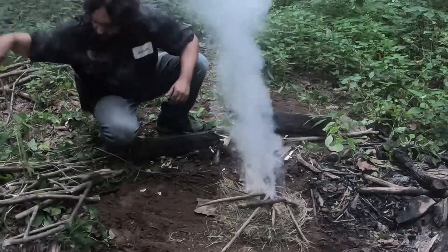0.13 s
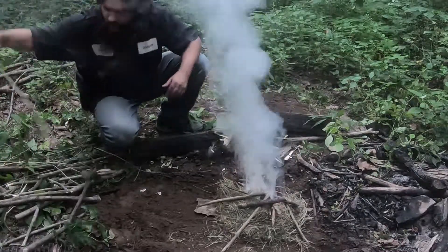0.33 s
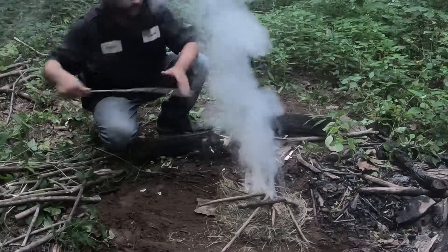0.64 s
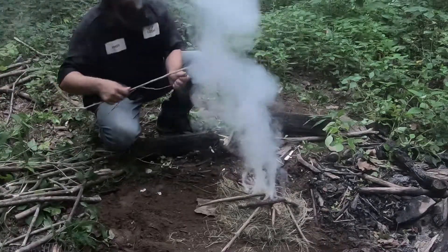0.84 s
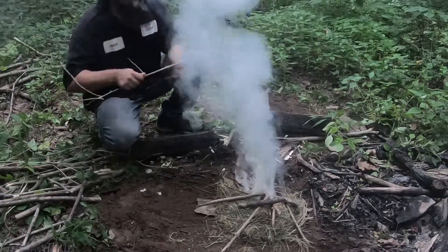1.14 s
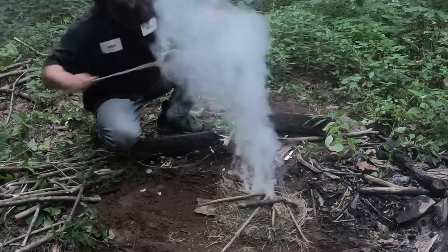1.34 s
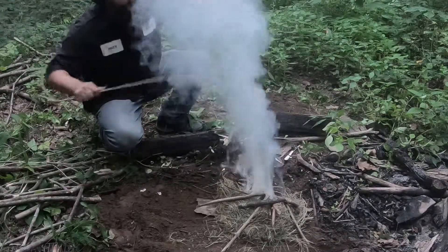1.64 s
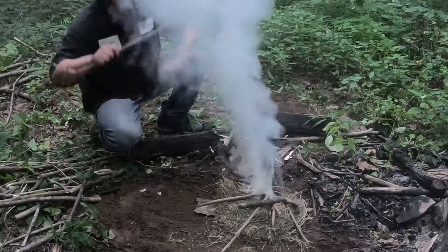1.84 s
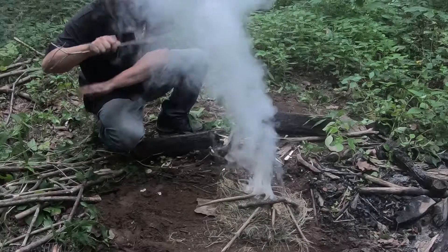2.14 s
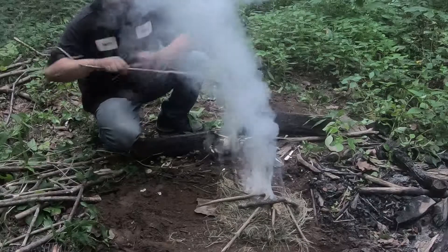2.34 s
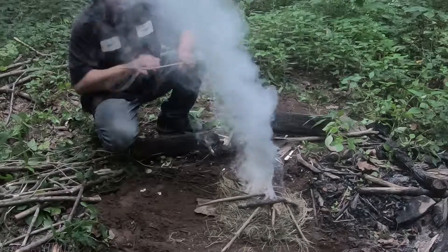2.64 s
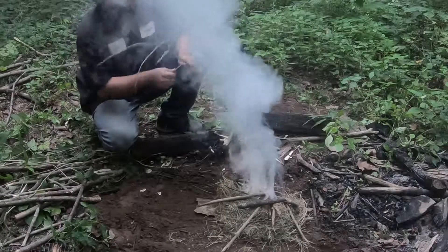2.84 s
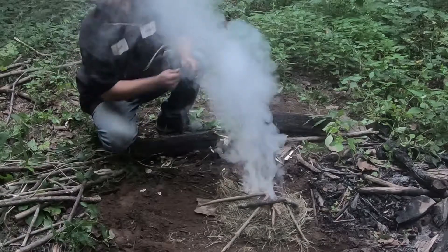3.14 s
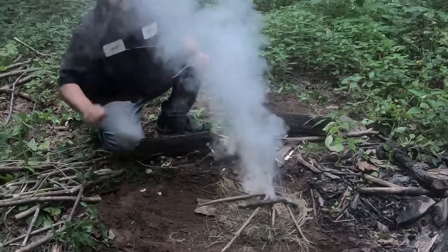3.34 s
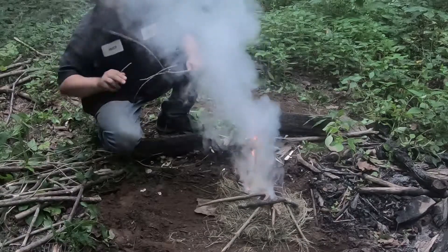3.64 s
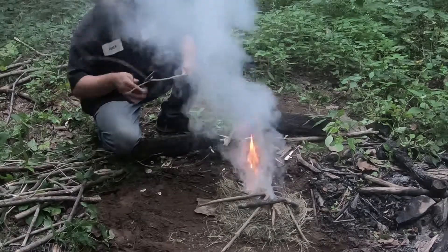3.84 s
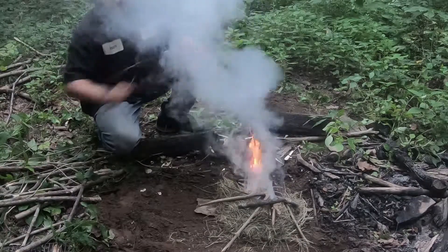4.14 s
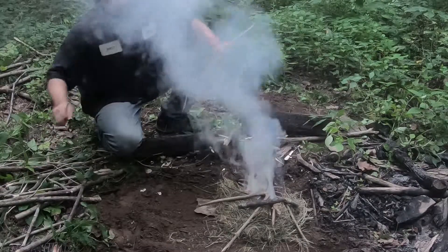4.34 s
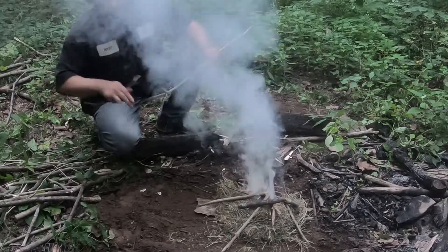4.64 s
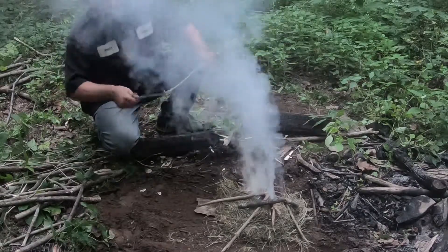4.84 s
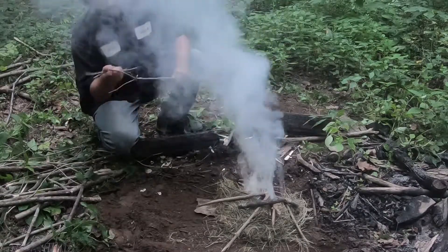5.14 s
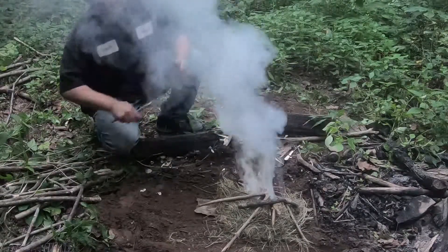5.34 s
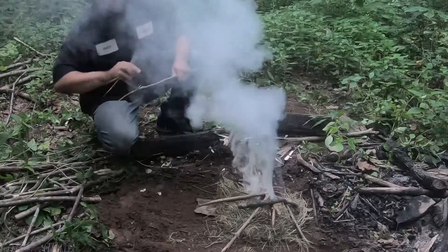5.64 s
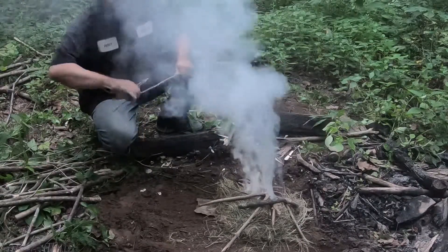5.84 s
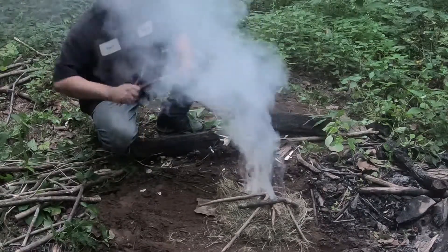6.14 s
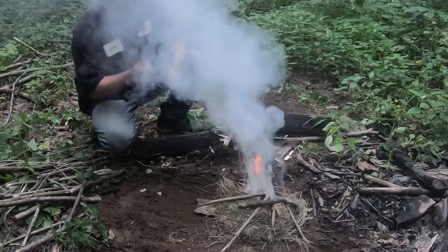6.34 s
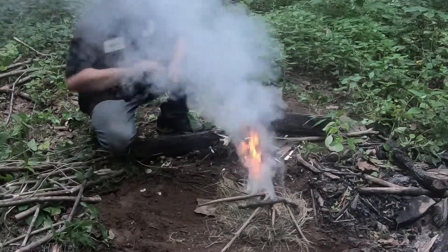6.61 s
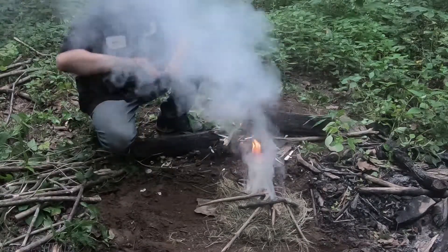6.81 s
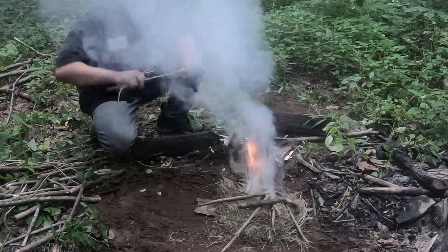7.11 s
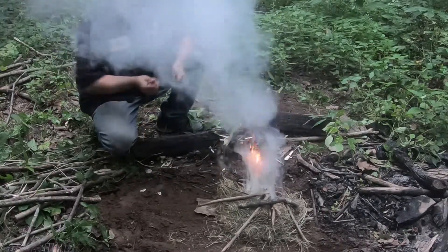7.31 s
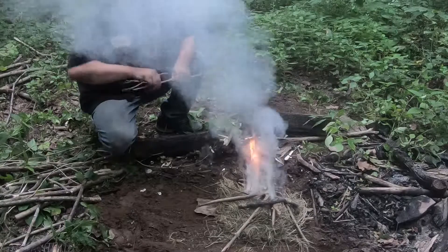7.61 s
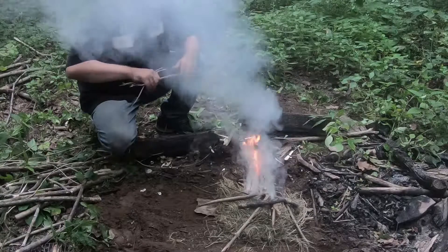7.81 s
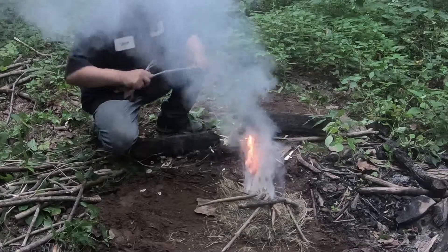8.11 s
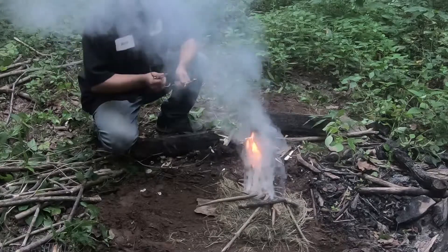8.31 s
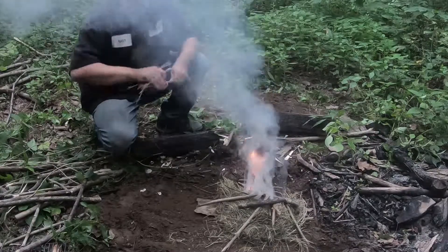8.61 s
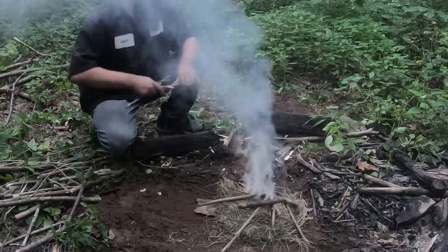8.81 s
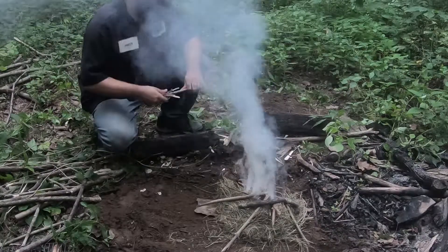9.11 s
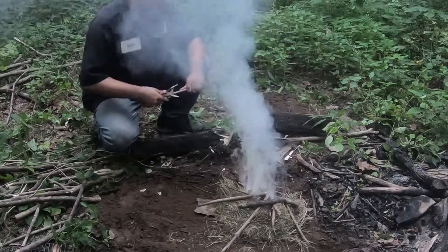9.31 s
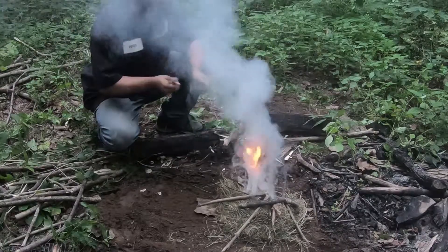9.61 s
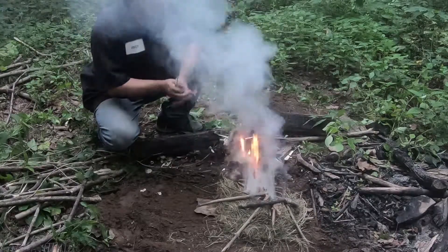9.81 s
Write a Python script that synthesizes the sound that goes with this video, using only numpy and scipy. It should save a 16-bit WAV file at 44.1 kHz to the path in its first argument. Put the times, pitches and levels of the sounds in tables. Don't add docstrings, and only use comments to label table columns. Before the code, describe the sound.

Close stereo pickup in a forest clearing. From 0 to 0.4 s dry brush rustles with crisp bark ticks under a cricket trill; a bright bird chip comes at 0.6 s. A dull, echoing twig break at 1.2 s brings a short rattle and small woody knocks until 1.9 s. A tiny crack follows at 2.3 s, a thin bright snap at 2.9 s, and faint high bird chips near 3.6 s. Louder bright snaps come at 4.9, 6.2 and 7.2 s, then the strongest, a tight double crack at 8.15 s, and a drier, duller break at 9.4 s. Between them are faint ticks, creaks, finger scratches and ember spits. Snaps leave soft bright tails among the trunks. Throughout, crickets pulse around 4 to 4.5 kHz over a steady insect band, with quiet low traffic rumble, wavering engine hums swelling slightly after 8.5 s, and soft air buffets.

```python
import sys
import numpy as np
from scipy import signal
from scipy.fft import rfft, irfft
from scipy.io import wavfile
from scipy.ndimage import uniform_filter1d

SR = 44100
rng = np.random.default_rng(int(sys.argv[2]) if len(sys.argv) > 2 else 0)


def pcm_store(signal):
    levels = np.round(np.clip(np.atleast_2d(signal), -1, 1) * 32767)
    wavfile.write(sys.argv[1], SR, levels.astype(np.int16).T)


def boost_factor(decibels):
    exponent = np.asarray(decibels, float) / 20
    return 10 ** exponent


N = 439236

# t/s, peak level/dB, low level/dB, treble level/dB, echo level/dB
SNAPS = [
    (1.2252, -28, -3.5, -12, 8.5),
    (2.9172, -23, -24, 1, -5),
    (4.9192, -18.5, -11, 9.5, -7),
    (6.1815, -14, -11, 7.5, 1),
    (7.1806, -16, -15, 6.5, -3),
    (8.1487, -14.5, -11, 1.5, 0),
    (8.1715, -10, -11, 2, -3),
    (9.3799, -12.5, -15, -8, -7.5),
]
# (f/Hz, level/dB)
SNAP_GRAIN = [
    ([(2200, 6), (3200, 6), (4300, 4), (7600, 10), (9400, -6), (10400, 12)], [(7500, 8)]),
    ([(1900, 5), (4900, -6), (5800, 2), (6600, -5), (7600, -9), (8300, 8), (10200, 4), (11000, -8)], []),
    ([(2700, -5), (1900, 3), (5700, -6), (6500, 3), (7400, 3), (8700, -3), (10100, 8), (11000, -5)], [(9300, -4)]),
    ([(2100, -4), (4000, 8), (7300, -6), (8500, 12), (7900, -6), (10900, -6), (13000, 6)], [(4800, -3)]),
    ([(1800, 6), (2900, -7), (3900, 10), (4400, -9), (6100, 7), (6900, -6), (9000, -4), (9600, 6), (10400, -5), (13600, 7)], [(4700, -3), (6700, -6), (7800, 7), (8600, -11), (9500, 5)]),
    ([(3300, 7), (4300, 7), (5000, -6), (7100, 12), (9500, -5), (10900, 8)], [(3000, -4)]),
    ([(1200, -6), (1700, 5), (3300, -3), (5900, -3), (7000, 4), (7600, -4), (8200, -6), (11100, 7), (12200, -6)], []),
    ([(1500, -13), (2300, 9), (3500, 4), (6200, -5), (7100, 7), (9600, -12), (11800, -8), (12600, 9)], [(3200, -6), (7800, 8), (9500, 1), (6500, 4), (11500, 6), (13000, 8)]),
]
# t/s, peak level/dB, treble level/dB
SMALL_SLIPS = [(2.3095, -39, -30), (2.9188, -29, 0), (2.9306, -43, 12), (4.112, -50, -12),
               (8.1514, -23, -1.5), (9.37, -46.5, -12), (9.3817, -19, -2), (9.3867, -33, -2),
               (2.2952, -44, -28), (1.2266, -25.5, -14), (1.251, -47, 5), (.0795, -35, -30),
               (4.9212, -31, 2), (7.1812, -23, 12), (1.2375, -41, -12), (9.3885, -37, 3)]
# t/s, peak level/dB, low level/dB, treble level/dB
TICKS = [(0.0128, -31, -22, -4.5), (0.0282, -33.5, -19, -10), (0.0772, -29.5, -5, -30),
         (0.142, -41, -18, -13), (0.2055, -42, -4, -22), (0.2217, -46, -6, -21), (0.4404, -44.5, -15, -21),
         (0.66, -48, -6, -16), (0.8023, -39, -4, -4), (1.2734, -37, -8, -22), (1.718, -47, -17, -23),
         (1.9015, -48, -2, -22), (1.914, -39.5, -6, -30), (1.9648, -47, -6, -16), (2.3025, -35, -12, -26),
         (2.9676, -44, -7, -4), (3.1615, -32.5, -8, -3), (3.2288, -42.5, -13, -23),
         (3.6295, -32.5, -10, -19), (3.7983, -46.5, -2, -15), (3.8264, -49, -3, -22),
         (4.1016, -40, -12, -10), (4.3505, -52, -25, -3), (5.9744, -49, 11, 2.5), (6.11, -48.5, -23, -7.5),
         (6.9772, -45.5, -4, -8.5), (7.3771, -44, -44, -22), (7.5233, -49, -18.5, -22),
         (7.65, -48, -27, -10), (8.8598, -48.5, -12, -3)]
# t/s, peak level/dB
CREAKS = [(0.167, -50), (1.049, -55.5), (1.5174, -49), (3.2444, -50), (4.3848, -49.5), (4.4665, -54),
          (4.5085, -52), (4.7443, -50.5), (5.7438, -54.5), (6.394, -46.5), (7.335, -54), (7.4355, -57),
          (7.708, -54), (8.5312, -54.5), (8.673, -52.5), (8.702, -55), (9.7798, -51.5), (9.842, -55)]
# t/s, peak level/dB
SPITS = [(0.736, -52), (2.8539, -53), (4.0662, -52.5), (4.5488, -53), (4.6455, -55), (5.231, -58),
         (6.563, -51), (7.476, -54), (7.5652, -50), (8.6268, -54.5), (9.1765, -56), (9.285, -52)]
# t/s, peak level/dB, ring
# f/Hz
TAPS = [(.0167, -37, 3000), (.0425, -42, 3200), (.0545, -42, 1500), (.0705, -43, 2400), (.0805, -40, 1900),
        (.1015, -45, 1400), (.148, -45, 2600), (.258, -48, 3500), (.4232, -56, 2400), (.445, -52, 2800),
        (.481, -55, 2800), (.493, -55, 2600), (1.166, -59, 2900), (1.203, -56, 1400), (1.211, -56, 1100),
        (2.5297, -61, 2600), (2.5641, -60, 2600), (2.8914, -56, 2900), (3.333, -60, 3300),
        (3.3589, -60, 3300), (3.813, -55, 1500), (3.834, -55, 1900), (3.9302, -59, 2700),
        (3.9901, -61, 2600), (4.0878, -54, 2800), (4.477, -54, 2100), (4.582, -61, 2100),
        (4.6002, -58, 3400), (4.6306, -60, 3100), (4.7169, -56, 2500), (5.313, -61, 3200),
        (5.52, -58, 3300), (5.8288, -63, 2300), (6.0304, -57, 2100), (6.8989, -61, 3400),
        (7.2622, -54, 3400), (7.342, -54, 3200), (7.4628, -58, 3400), (7.5057, -54, 3300),
        (7.529, -53, 2600), (7.6124, -59, 3200), (7.6314, -56, 2200), (7.7711, -61, 3500),
        (7.9182, -62, 2400), (8.0065, -59, 3000), (8.0379, -57, 2600), (8.0589, -59, 2900),
        (8.076, -59, 2800), (8.128, -53, 2700), (8.138, -48, 2900)]
# t/s, peak level/dB
HAIRS = [(4.909, -69), (4.933, -56), (6.16, -70), (6.17, -62), (6.196, -58), (7.16, -76), (7.17, -66),
         (7.195, -57)]
# t/s, peak level/dB, low ring f/Hz, upper
# ring f/Hz, t60/s
KNOCKS = [(1.379, -50, 830, 2090, 0.1), (1.462, -46.5, 796, 1510, 0.055), (1.517, -51, 804, 2370, 0.067),
          (1.555, -49, 825, 1480, 0.05), (1.719, -43, 709, 1470, 0.09), (1.899, -53, 810, 1590, 0.055),
          (1.916, -39, 690, 1500, 0.024), (1.915, -44, 2150, 2800, .016), (1.742, -47, 670, 1450, .07),
          (4.746, -47, 1080, 1450, 0.025), (4.351, -52, 2100, 3000, .02), (4.509, -54, 2050, 2900, .02),
          (.079, -38, 900, 2900, .03), (.167, -42, 450, 1100, .03), (7.144, -50, 2250, 2500, 0.035),
          (2.304, -37, 3400, 1850, .035), (9.381, -34, 760, 480, .028), (2.9201, -20, 4400, 4900, .013)]
# f/Hz, level/dB, t60/s
STICK_MODES = [(793, 1.5, 0.032), (1505, 4, 0.032), (1855, -6, 0.05), (2250, 8, 0.03), (2720, 9, 0.018),
               (3400, 4, .015)]
# f/Hz, width/Hz, level/dB
ALL_ROUND = [(7600, 1600, 4), (9500, 1100, -4)]
# f/Hz, width/Hz, level/dB
PORT_DIP = (8050, 600, -8)
# f/Hz, left lead/rad
PORT_PHASE = [(5000, .1), (7300, 1.1), (8200, .2), (9700, 0), (10600, 1.5), (12100, .4), (16000, 1.1)]
# f/Hz, left-right level/dB
PORT_BALANCE = [(60, 3.0), (110, 2.5), (200, 0.0), (380, -3.0), (700, 1.5), (1290, 4.5), (2380, 4),
                (4400, 0.5), (8120, -1.5), (15000, 0)]

# t at top/s, level/dB, rise/s, fall/s
DRAGS = [(0.002, -53, .01, .2), (.058, -48.5, .3, .12), (0.081, -47, .015, .07), (.14, -53, .2, .3),
         (0.21, -51, .03, .15)]
# t at top/s, level/dB, rise/s, fall/s
SHAKES = [(1.262, -50, .15, .15), (1.316, -55, .2, .5)]
# t at top/s, level/dB, rise/s, fall/s
FINGERS = [(.485, -62, .12, .06), (.815, -62, .05, .12), (3.66, -68, .03, .25), (3.82, -64, .08, .08),
           (4.104, -58, .06, .09), (7.36, -68, .3, .1), (7.57, -70, .5, .08), (7.636, -69, .1, .3)]
# f/Hz, level/dB per Hz
BRUSH = [(180, -13), (300, 0), (1220, 1.5), (1840, 0), (2980, 1), (3940, -1.5), (4350, -0.5), (7000, -9),
         (7900, -20), (8900, -12), (9930, -15.5), (13800, -27), (15500, -65)]
# f/Hz, level/dB per Hz
RATTLE = [(180, -50), (300, -9), (652, -14), (821, -16.5), (1260, -14), (2100, 7.5), (3750, -3), (4420, 0),
          (4880, -12), (9140, -19), (13800, -33), (15500, -57)]
# f/Hz, level/dB
HANDLING = [(700, -27), (1800, -3.5), (3000, -0.5), (5000, 4.5), (9500, -19.5), (14000, -28), (15500, -60)]

# f/Hz, t60/s
TREE_T60 = [(300, 0.58), (1500, 0.66), (4000, 0.8), (9000, 0.81), (15000, 0.63)]
# f/Hz, level/dB
TREE_COLOUR = [(500, -1), (2500, -4.5), (6000, -3), (10000, -0.5), (12000, -0.5), (14800, -2.5),
               (15600, -46)]
# f/Hz, likeness
ECHO_SAME = [(500, .1), (1400, .2), (3100, 0.67), (6800, .2)]
# delay/s, level/dB
NEAR_TRUNKS = [(0.013, -14), (0.0168, -11.5), (.024, -19), (0.042, -20.5)]

# (start t/s, level/dB)
CRICKETS = [
    (4435, .263, 2, [(-.053, -58), (2.023, -54), (4.005, -54), (5.673, -54), (9.39, -54)]),
    (4430, .239, 2.1, [(7.442, -54)]),
    (4130, .49, -1.5, [(.29, -62), (3.1, -65), (5.404, -64), (7.68, -66)]),
    (3960, .42, 0.5, [(.75, -72), (2.72, -73), (3.45, -72), (5.38, -70), (6.85, -73), (8.2, -73)]),
    (4570, .34, -13, [(1.07, -62.5), (3.774, -65.5), (6.55, -62)]),
    (4500, .26, 3.5, [(.3, -65), (9.13, -62.5), (9.7, -65)]),
    (4330, .4, 0.2, [(.72, -63), (2.97, -63), (5.02, -65.5), (6.27, -61)]),
    (4260, .55, -6, [(1.404, -66.5), (2.35, -68), (4.33, -70), (6.87, -72)]),
]
# t/s, from f/Hz, to f/Hz, length/s, level/dB
CHIPS = [(0.587, 5460, 8300, 0.016, -45), (3.533, 7550, 8650, 0.069, -65), (3.62, 7400, 8400, 0.021, -59),
         (3.626, 6800, 7620, 0.028, -63.5), (3.702, 7870, 8600, 0.029, -67),
         (7.594, 7770, 8620, 0.044, -68), (7.678, 7210, 7670, 0.038, -73), (7.687, 8120, 8560, .055, -71),
         (7.776, 7170, 7620, 0.051, -69), (7.793, 7830, 8500, .05, -69)]
# t/s, level/dB
HIDDEN_CHIPS = [(5.089, -61), (5.19, -60.5), (7.661, -66)]
# t/s, from f/Hz, to f/Hz, level/dB
DEEP_CHIPS = [(4.59, 6300, 8520, -57), (6.45, 7000, 8500, -57), (9.0, 6300, 8630, -59.5)]

# f/Hz, level/dB per Hz
CHORUS = [(2060, -52), (3500, -30), (3880, -23), (4120, -1), (4350, 0), (4690, -7.5), (5160, -2.5),
          (7110, -24), (7950, -30.5), (10300, -27), (10800, -34.5), (11500, -58.5), (12500, -59),
          (16200, -88.5), (22000, -120)]
# f/Hz, level/dB per Hz
AIR = [(15, -38), (28, -17), (85, -15), (118, -12), (140, -2), (200, -1.5), (290, -6), (499, -14.5),
       (822, -6.5), (1060, -14), (1330, -15), (2050, -30.5), (2380, -26.5), (3050, -37.5), (3600, -31),
       (4680, -53.5), (7920, -120)]
# f/Hz, likeness
AIR_SAME = [(60, 0.94), (110, 0.81), (200, 0.79), (380, 0.089), (700, -0.0015), (1290, 0.0), (2380, 0.36),
            (4400, 0.67), (8120, -0.31), (15000, -0.02)]
# t/s, level/dB
TRAFFIC = [(0.0, -63), (1.8, -65), (2.0, -63), (3.96, -67), (4.71, -63.5), (5.49, -68), (8.74, -64),
           (9.46, -70), (9.96, -63)]
# f/Hz, width/Hz, level/dB
DRONE = [(75.4, 9, -73), (152, 9, -76)]
# t/s, level/dB
DRONE_SWELL = [(8.4, -23), (9.0, -5.5), (9.96, 3)]
# from t/s, to t/s, f/Hz, level/dB
HUMS = [(0, 4.1, 172, -72), (.3, 2.6, 203, -74), (2.6, 4, 260, -74), (3.3, 5.8, 320, -79),
        (3.9, 7.5, 157, -71), (4.2, 5.2, 196, -73), (5, 6.3, 232, -77), (6.4, 7.7, 190, -75),
        (7.5, 9.1, 151, -72), (7.7, 8.9, 227, -75), (9.4, 10.2, 151, -70)]
# t/s, level/dB
BUFFETS = [(1.51, -71), (4.8, -73), (5.23, -71), (5.6, -72), (6, -74), (6.78, -69), (7.26, -70),
           (7.55, -74), (8.78, -68), (9.4, -71), (9.75, -71)]

SNAP_UPPER_DB, SNAP_UPPER_PER_TREBLE = 2.5, .25
TICK_T60_S, TICK_T60_S_PER_DB = .025, .0008
SAME_BREAK_S = .01
GRAIN_WIDTH_HZ = 750
TRUNK_ECHO_S, TRUNK_ECHO_DB = .0136, -19
STROKE_SPAN_DB = 30
STROKES_PER_S, STROKE_SAG, PITCH_SPREAD, PACE_SPREAD = 41.6, .043, .0025, .002
CHIP_DIRECT_DB = -2.5
HIDDEN_FROM_HZ, HIDDEN_TO_HZ, HIDDEN_S, HIDDEN_DIRECT_DB = 7000, 8600, .02, -20.5
DEEP_RISE_DB_PER_S, RUMBLE_SWAY_DB, DEEP_SWAY_DB = .7, 1.5, 2.5
HUM_WIDTH_HZ = 7
BUFFET_HZ, BUFFET_WIDTH_HZ, BUFFET_S = 85, 70, .14


def twigs():
    out, feed, knocks = np.zeros((3, 2, N))
    cracks = []
    for (s, db, low_db, treble_db, echo_db), grain in zip(SNAPS, SNAP_GRAIN):
        upper_db = SNAP_UPPER_DB + SNAP_UPPER_PER_TREBLE * treble_db
        cracks.append((s, echo_db, crack(db, low_db, upper_db, treble_db, .022, grain)))

    # t/s, peak/dB, low/dB, treble/dB, t60/s
    small = [(s, db, -10, treble_db, .02) for s, db, treble_db in SMALL_SLIPS]
    small += [(s, db, low_db, treble_db, TICK_T60_S + TICK_T60_S_PER_DB * (db + 50))
              for s, db, low_db, treble_db in TICKS]
    small += [(s, db, -7, -21, TICK_T60_S) for s, db in CREAKS]
    small += [(s, db, -12, -7, TICK_T60_S) for s, db in SPITS]
    for s, db, low_db, treble_db, t60_s in small:
        cracks.append((s, -3, crack(db, low_db, .5 * treble_db, treble_db, t60_s)))
    for s, db, ring_hz in TAPS:
        cracks.append((s, -4, crack(db, -10, -7, -14, .015, ([(ring_hz, 10)], []))))
    for s, db in HAIRS:
        cracks.append((s, -8, crack(db, -30, 8, 22, .012)))

    for s, echo_db, (sound, click) in cracks:
        add(out, s + .0003, sound)
        to_break_s = min(abs(s - row[0]) for row in SNAPS)
        if not 0 < to_break_s < SAME_BREAK_S:
            add(feed, s, boost_factor(echo_db) * click)

    add(knocks, SNAPS[0][0] + .0011, boost_factor(-20.5) * rings(STICK_MODES), 2.5)
    for s, peak_db, low_hz, upper_hz, t60_s in KNOCKS:
        modes = [(low_hz, 0, t60_s), (upper_hz, -1.5, .58 * t60_s)]
        add(knocks, s, boost_factor(peak_db) * rings(modes), 2.5)
    return ports(out) + knocks, feed + boost_factor(-4) * knocks


def crack(peak_db, low_db, upper_db, treble_db, t60_s, grain=((), ())):
    t = np.arange(2600) / SR
    both, left, right, size = rng.standard_normal((4, len(t)))
    fading = boost_factor(-60 * t / .0042) + boost_factor(-12 - 60 * t / max(t60_s, .005))
    slips = (both + .38 * np.array([left, right])) * boost_factor(1.7 * size) * fading
    slips[:, 0] += 4.6
    slips = slips + .26 * np.roll(slips, round(.0031 * SR), axis=1)

    colour = [(200, low_db - 20), (450, low_db - 1), (1100, low_db), (2000, -6), (3900, 1),
              (5800, upper_db - 1), (7900, treble_db - 2.5), (9700, treble_db + .6),
              (11100, treble_db - 13.5), (14500, treble_db - 20.5), (16600, treble_db - 34),
              (17300, treble_db - 77.5)]
    taps = coloured(np.ones(1), colour)
    straight = favour(taps, *PORT_DIP)
    for hz, db in grain[0]:
        straight = favour(straight, hz, GRAIN_WIDTH_HZ, db)
    for band in ALL_ROUND:
        taps = favour(taps, *band)
    for hz, db in grain[1]:
        taps = favour(taps, hz, GRAIN_WIDTH_HZ, db)

    bright = np.diff(slips, 2, axis=1, prepend=np.zeros((2, 2)))
    trunk_echo = boost_factor(TRUNK_ECHO_DB) * np.roll(bright, round(TRUNK_ECHO_S * SR), axis=1)
    sound = signal.oaconvolve(slips + trunk_echo, straight[None], axes=1)
    gain = boost_factor(peak_db) / abs(resonate(sound.mean(0), 3000, 1400)).max()
    return gain * sound, gain * taps * np.linalg.norm(slips[0])


def rings(modes):
    t = np.arange(5000) / SR
    ring = sum(boost_factor(db - 60 * t / t60_s) * np.sin(2 * np.pi * hz * t) for hz, db, t60_s in modes)
    ring = ring * (1 - np.exp(-t / .00033))
    return ring / abs(ring).max()


def ports(x):
    hz = np.fft.rfftfreq(N, 1 / SR)
    half = boost_factor(read(PORT_BALANCE, hz) / 2) * np.exp(.5j * read(PORT_PHASE, hz))
    return irfft(rfft(x) * np.array([half, 1 / half]), N)


def rustle():
    out = np.zeros((2, N))
    for strokes, colour, spread_db in ((DRAGS, BRUSH, 1.0), (SHAKES, RATTLE, .6), (FINGERS, HANDLING, 3.5)):
        start_s = max(strokes[0][0] - .5, 0)
        t = np.arange(start_s, strokes[-1][0] + 1, 1 / SR)
        force_db = np.max([db - STROKE_SPAN_DB * np.maximum((s - t) / rise_s, (t - s) / fall_s)
                           for s, db, rise_s, fall_s in strokes], axis=0)
        clumps = evened(uniform_filter1d(rng.standard_normal(len(t)), size=200))
        sizes = boost_factor(spread_db * np.minimum(rng.exponential(1, len(t)), 4) + 1.2 * clumps)
        hits = rng.random(len(t)) < 6000 / SR
        grains = sizes * hits * rng.standard_normal(len(t))
        scratch = evened(coloured(grains, colour)[:len(t)])
        add(out, start_s, boost_factor(force_db + 3.5) * scratch, 2.5)
    return out


def embers():
    sizes = boost_factor(-69.5 + 4.5 * np.minimum(rng.exponential(1, N), 3))
    ticks = sizes * (rng.random(N) < 25 / SR)
    puff = rng.standard_normal(300) * boost_factor(-60 * np.arange(300) / SR / .008)
    colour = [(900, -25.5), (2200, .5), (3400, -5.5), (9000, -8.5), (15000, -40)]
    return coloured(signal.oaconvolve(ticks, puff), colour)[:N]


def trees(x, rise_s):
    def shape_db(hz, t):
        lumps_db = 2.8 * patches(hz, t, wide=8, long=5)
        return read(TREE_COLOUR, hz) - 60 * t / read(TREE_T60, hz) + lumps_db

    tail = pair(shape_db, ECHO_SAME, size=256, count=SR + SR // 2)
    tail = tail * (1 - np.exp(-np.arange(tail.shape[1]) / SR / rise_s))
    tail = tail / np.linalg.norm(tail[0])
    for delay_s, echo_db in NEAR_TRUNKS:
        bark = np.diff(rng.standard_normal((2, 41))) / 9
        add(tail, delay_s, boost_factor(echo_db) * bark)
    return signal.oaconvolve(x.mean(0)[None], tail, axes=1)[:, :N]


def crickets():
    out = np.zeros((2, N))
    for hz, length_s, pan_db, trills in CRICKETS:
        t = np.arange(0, length_s, 1 / SR)
        for start_s, level_db in trills:
            strokes = t * STROKES_PER_S * (1 + PACE_SPREAD * rng.standard_normal())
            within = strokes % 1
            swing = np.sin(np.pi * np.clip(within / .8, 0, 1)) ** .55
            force, stray = rng.standard_normal((64, 2))[strokes.astype(int)].T
            wing_hz = hz * (1 + STROKE_SAG * (.4 - within) + PITCH_SPREAD * stray)
            tone = np.sin(2 * np.pi * np.cumsum(wing_hz) / SR)
            trill = evened(boost_factor(1.1 * force) * swing * tone) * signal.windows.tukey(len(t), .15)
            add(out, start_s, boost_factor(level_db) * trill, pan_db)
    return out


def birds():
    straight, sung, deep = np.zeros((3, 2, N))
    chips = [(*row, CHIP_DIRECT_DB) for row in CHIPS]
    chips += [(s, HIDDEN_FROM_HZ, HIDDEN_TO_HZ, HIDDEN_S, db, HIDDEN_DIRECT_DB) for s, db in HIDDEN_CHIPS]
    for s, from_hz, to_hz, length_s, level_db, direct_db in chips:
        t = np.arange(0, length_s, 1 / SR)
        risen = (1 - np.exp(-t / .016)) / (1 - np.exp(-length_s / .013))
        phase = 2 * np.pi * np.cumsum(from_hz + (to_hz - from_hz) * risen) / SR
        chip = boost_factor(level_db) * np.sin(phase) * (.56 + risen ** .9) * signal.windows.tukey(len(t), .25)
        add(sung, s, chip)
        add(straight, s, boost_factor(direct_db) * chip)
    for s, from_hz, to_hz, level_db in DEEP_CHIPS:
        hz = np.linspace(from_hz, to_hz, 800)
        whistle = np.sin(2 * np.pi * np.cumsum(hz) / SR) * signal.windows.tukey(len(hz), .2)
        add(deep, s, boost_factor(level_db) * whistle)
    return straight, sung, deep


def chorus():
    def shape_db(hz, t):
        singers = np.exp(-((hz - 4150) / 350) ** 2)
        return read(CHORUS, hz) + (1 + 1.8 * singers) * patches(hz, t, wide=4, long=40)

    return boost_factor(-55.5) * evened(pair(shape_db, AIR_SAME, size=1024))


def traffic():
    s, rumble_db = np.transpose(TRAFFIC)

    def shape_db(hz, t):
        deep = 1 / (1 + (hz / 110) ** 6)
        rumble = (1 - deep) / (1 + (hz / 380) ** 2)
        sway = evened(uniform_filter1d(rng.standard_normal((2, len(t))), size=30, axis=1))
        course_db = np.interp(t, s, rumble_db - rumble_db.mean())
        drift_db = rumble * (course_db + RUMBLE_SWAY_DB * sway[0])
        drift_db = drift_db + deep * (DEEP_RISE_DB_PER_S * (t - t.mean()) + DEEP_SWAY_DB * sway[1])
        return read(AIR, hz) + 2.0 * patches(hz, t, wide=4, long=12) + drift_db

    shake = rng.standard_normal(N)
    drone = sum(boost_factor(db) * hum(shake, hz, width_hz) for hz, width_hz, db in DRONE)
    swell = boost_factor(np.interp(np.arange(N) / SR, *np.transpose(DRONE_SWELL), left=-60))
    return boost_factor(-61) * evened(pair(shape_db, AIR_SAME, size=2048)) + swell * drone


def hums_and_buffets():
    out = np.zeros((2, N))
    for start_s, end_s, hz, db in HUMS:
        tone = hum(rng.standard_normal(round((end_s - start_s) * SR)), hz, HUM_WIDTH_HZ)
        add(out, start_s, boost_factor(db) * tone * signal.windows.tukey(len(tone), .3))
    for s, db in BUFFETS:
        puff = hum(rng.standard_normal(round(BUFFET_S * SR)), BUFFET_HZ, BUFFET_WIDTH_HZ)
        add(out, s - BUFFET_S / 2, boost_factor(db) * puff * np.hanning(len(puff)))
    return out


def hum(shake, hz, width_hz):
    return evened(resonate(resonate(shake, hz, width_hz), hz, width_hz))


def resonate(x, hz, width_hz):
    turn = np.exp(2j * np.pi * hz * np.arange(x.shape[-1]) / SR)
    r = np.exp(-np.pi * width_hz / SR)
    return 2 * (turn * signal.lfilter([1 - r], [1, -r], x / turn)).real


def favour(x, hz, width_hz, db):
    return x + (boost_factor(db) - 1) * resonate(x, hz, width_hz)


def coloured(x, points):
    log_gain = read(points, abs(np.fft.fftfreq(1024, 1 / SR))) * np.log(10) / 20
    taps = np.fft.ifft(np.exp(np.conj(signal.hilbert(log_gain)))).real[:512]
    return signal.oaconvolve(x, taps)


def pair(shape_db, likeness, size, count=N):
    frames = 4 * count // size + 5
    hz = np.fft.rfftfreq(size, 1 / SR)[:, None]
    a, b, c, d = rng.standard_normal((frames, len(hz), 4)).T
    same = np.clip(read(likeness, hz), -1, 1)
    left = a + 1j * b
    right = same * left + np.sqrt(1 - same ** 2) * (c + 1j * d)
    z = np.array([left, right]) * boost_factor(shape_db(hz, np.arange(frames) * size / 4 / SR))
    return signal.istft(z, nperseg=size, noverlap=3 * size // 4)[1][:, :count]


def patches(hz, t, wide, long):
    field = rng.standard_normal((len(t), len(hz))).T
    return evened(uniform_filter1d(uniform_filter1d(field, size=wide, axis=0), size=long, axis=1))


def evened(x):
    return x / np.sqrt(np.mean(x ** 2) + 1e-20)


def read(points, hz):
    f, value = np.transpose(points)
    return np.interp(np.log(hz + 1), np.log(f + 1), value)


def add(mix, s, sound, pan_db=0):
    sound = sound[..., max(-round(s * SR), 0):]
    part = mix[:, max(round(s * SR), 0):][:, :sound.shape[-1]]
    part += sound[..., :part.shape[1]] * boost_factor(np.array([[pan_db], [-pan_db]]) / 2)


def scene():
    wood, feed = twigs()
    brush = rustle() + embers()
    trills = crickets()
    straight, sung, deep = birds()
    near = wood + brush + boost_factor(-10.5) * trees(feed + brush, rise_s=.0068)
    insects = boost_factor(2) * trills + boost_factor(-5.5) * trees(trills, rise_s=.0048)
    chips = straight + boost_factor(7) * trees(sung, rise_s=.004) + boost_factor(2.5) * trees(deep, rise_s=.061)
    return near + insects + chips + chorus() + traffic() + hums_and_buffets()


def faint_treble(x):
    hz, _, z = signal.stft(x, SR, nperseg=1024, noverlap=512)
    power = (abs(z[:, :512]) ** 2).reshape(2, 64, 8, -1).mean((0, 2))
    floor_db = -104 + 8 * uniform_filter1d(rng.standard_normal(power.shape), size=3)
    faint = np.repeat(power < boost_factor(floor_db) ** 2, 8, axis=0) & (hz[:512, None] > 11000)
    faint = np.pad(faint, ((0, 1), (0, 0)))
    return signal.istft(z * faint, SR, nperseg=1024, noverlap=512)[1][:, :N]


def low_pass(x):
    return signal.sosfilt(signal.butter(12, 16990, fs=SR, output="sos"), x)


def record(dry):
    mix = dry - faint_treble(dry)
    return low_pass(mix)


dry = scene()
out = record(dry)
pcm_store(out)
```